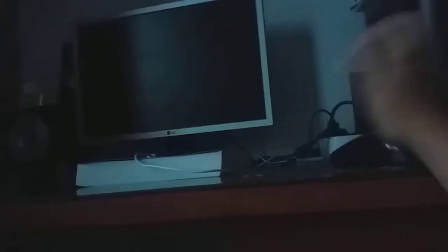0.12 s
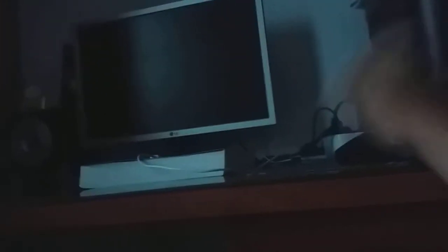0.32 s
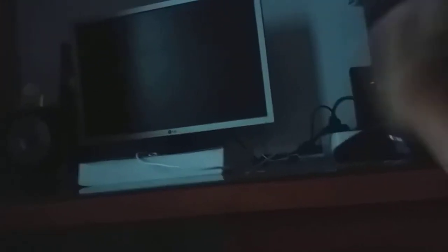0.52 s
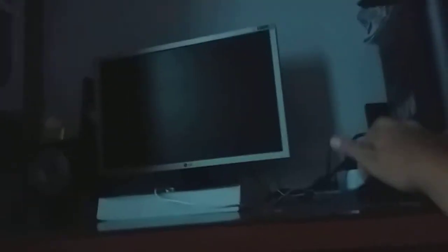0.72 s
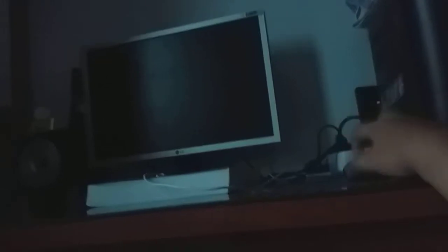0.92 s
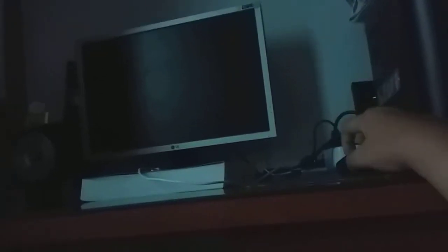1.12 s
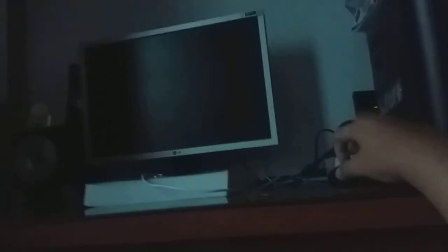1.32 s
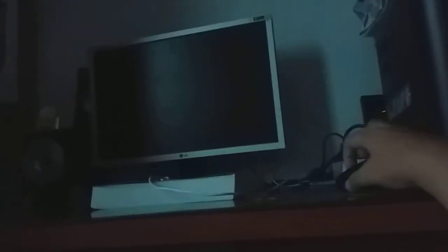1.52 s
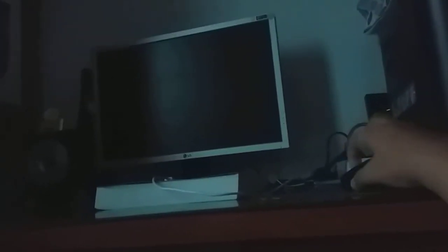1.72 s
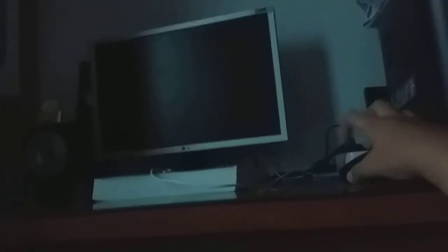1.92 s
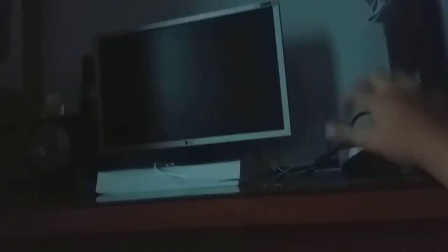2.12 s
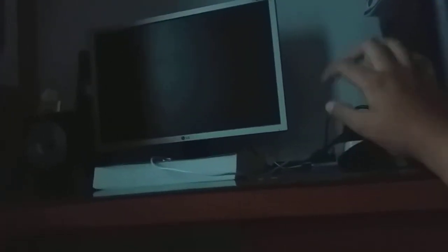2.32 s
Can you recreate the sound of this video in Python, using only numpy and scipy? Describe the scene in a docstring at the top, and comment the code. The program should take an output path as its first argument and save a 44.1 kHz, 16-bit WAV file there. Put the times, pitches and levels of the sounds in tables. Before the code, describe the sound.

Sharp mouse clicks come unevenly, strong ones early, a softer one near the middle, then more of mixed strength; low desk thumps, tiny ticks between, short bright room echo and very faint background hiss.

```python
"""Mouse clicks on a wooden desk

In a small, bare room a computer mouse is clicked four or five times a second. Each press is a broad crack
plus resonances of the plastic shell, with a swelling thump of the desk. Light ticks, two with a thin
metallic ping, come from the same model. Shaped noise and ringing modes give the bright, short echo;
filtered noise lies beneath. The stereo microphone hears one source, balanced by frequency."""
import sys
import numpy as np
from scipy import signal
from scipy.fft import rfft, irfft, next_fast_len
from scipy.io import wavfile
from scipy.ndimage import uniform_filter1d

SR = 44100
rng = np.random.default_rng(int(sys.argv[2]) if len(sys.argv) > 2 else 0)


def master(y):
    """Save y as 16-bit WAV."""
    cut = np.clip(np.atleast_2d(y).T, -1, 1)
    pcm = np.round(cut * 32767)  # scale
    wavfile.write(sys.argv[1], SR, pcm.astype(np.int16))


N = 108045
LEAD_IN_S = 1  # room on the track for a press that begins before time zero


def amp(db):
    """Decibels to gain."""
    return 10 ** (np.asarray(db) / 20)


def at(points, hz):
    """Read (freq_hz, value) points on a log-frequency axis."""
    point_hz, values = np.array(points, float).T
    return np.interp(np.log(np.maximum(hz, 1)), np.log(point_hz), values)


def fade(t, t60):
    """Exponential decay, 60 dB in t60 seconds."""
    return np.exp(-np.log(1000) * t / t60)


def colour(x, points):
    """Minimum-phase filter with the given (freq_hz, level_db) response, built by folding its cepstrum."""
    size = 2 * next_fast_len(len(x))
    hz = np.fft.rfftfreq(size, 1 / SR)
    cepstrum = irfft(np.log(amp(at(points, hz))))
    cepstrum[1:size // 2] *= 2
    cepstrum[size // 2 + 1:] = 0
    response = np.exp(rfft(cepstrum))
    return irfft(rfft(x, size) * response)[:len(x)]


def burst(envelope, size):
    """Noise under an envelope, its spectrum evened out to gain 1 over groups of `size` bins."""
    noise = rng.standard_normal(len(envelope)) * envelope
    spectrum = rfft(noise, 2 * len(noise))
    power = uniform_filter1d(abs(spectrum) ** 2, size)
    return irfft(spectrum / np.sqrt(power + 1e-12))[:len(noise)]


def add(track, start_s, x):
    """Mix a sound into the track, counting time from the end of the lead-in."""
    i = int((start_s + LEAD_IN_S) * SR)
    track[i:i + len(x)] += x[:len(track) - i]


# button presses on the desk: start_s, level_db, pitch_ratio (of the shell), contact_t60_s,
# bass_db, presence_db, knock_db, treble_db, thump_db (of the desk, apart from level_db)
BUTTON_PRESSES = [(-.07, 2, 0.94, 0.0082, -19, -0.5, -19, 1.5, -1),
                  (0.012, -17.5, 1.11, 0.035, -2, -3, 3.5, -13, -24),
                  (0.203, 2, 0.973, 0.01, -1.5, 2.5, 0, 2.5, 3),
                  (0.3833, 3, 0.98, 0.012, -5, 0, 2.5, -2, -0.5),
                  (0.5953, 0.5, 0.92, 0.0085, 4, 2, 0.5, 3, 4.5),
                  (0.9674, -13.5, 0.98, 0.033, -17, -7, 3.5, -8, -10),
                  (1.355, -1.5, 1.007, 0.028, 6, 1.5, -15, -1, 0),
                  (1.5665, -8.5, 0.985, 0.0097, -4, -5, 10.5, 1, -7),
                  (1.7735, 1, 0.96, 0.0095, -5.5, -0.5, -1, -2, -12),
                  (1.9967, -2, 0.96, 0.0064, -3.5, 2, -7, 1, -15),
                  (2.1583, -10.5, 0.94, 0.077, 8.5, -5.5, 5, -11.5, -1)]


def play_presses(track):
    """Each press snaps through its own freshly drawn desk and room echo, and thumps the desk."""
    for start_s, level_db, pitch_ratio, contact_t60, *tone_db, thump_db in BUTTON_PRESSES:
        press = strike(click(pitch_ratio, *tone_db), contact_t60, surroundings())
        add(track, start_s, amp(level_db) * press)
        add(track, start_s, amp(thump_db) * thump())


# light ticks as the button lets go or a finger shifts:
# start_s, level_db, bass_db, treble_db, thump_db (of the desk, apart from level_db)
LIGHT_TICKS = [(.043, -27.5, 13, -11, -10.5), (0.469, -13, -5, -7, -7.5), (.7593, -31, 10, 8.5, -16),
               (.7795, -26, -19.5, -4, -43), (.7845, -22, 6.5, -3, -10.5), (0.9537, -46.5, -13, 1, -29),
               (1.154, -29, -9, 7, -18), (1.2214, -32, 3.5, 5.5, -14.5), (1.4674, -27.5, 10, 3.5, -17),
               (1.6607, -30, -4, 5, -30), (1.8942, -28, -9, 4.5, -25), (2.0977, -35, -33, 8, -18),
               (2.4205, -50.5, 21, 13.5, -21.5)]
TICK_PITCH_RATIO, TICK_CONTACT_S = 0.98, 0.016  # shell pitch; t60 of the contact
TICK_ROOM_DB = -1.5  # light ticks stir the room less


def play_ticks(track):
    """Ticks are weaker snaps of the same shell, all heard through one response of desk and room."""
    room = amp(TICK_ROOM_DB) * surroundings()
    for start_s, level_db, bass_db, treble_db, thump_db in LIGHT_TICKS:
        presence_db, knock_db = treble_db / 2, 0
        snaps = click(TICK_PITCH_RATIO, bass_db, presence_db, knock_db, treble_db)
        add(track, start_s, amp(level_db) * strike(snaps, TICK_CONTACT_S, room))
        add(track, start_s, amp(thump_db) * thump())


def strike(snaps, contact_t60, room):
    """A snap heard directly, with its chatter, and again through desk and room."""
    towards, around = snaps
    sound = signal.fftconvolve(around, room)
    direct = signal.fftconvolve(towards, contact(contact_t60))
    sound[:len(direct)] += direct
    return sound


# modes of the plastic shell, before pitch, scatter and tone:
# freq_hz, level_db, t60_s, knock_share (part in the hollow knock, 0-1)
SHELL_MODES = [(509, 16, 0.039, 0.17), (798, 20.5, 0.014, 0), (1328, 11, 0.025, 0.18), (1602, 16, 0.024, 0),
               (2174, 19, 0.02, 0), (2340, 13.5, 0.011, 0.3), (2710, 14, 0.022, 0.22),
               (3215, 9.5, .015, 0.1), (3776, 9.5, 0.012, 0.85), (5435, 7.5, 0.017, 0),
               (5670, 8, 0.012, 0.27), (6720, 3.5, 0.01, 0), (7320, 6.5, 0.008, .3), (8680, 0, .01, 0.02),
               (12850, 0, 0.0072, 0)]
# snap of the contact: freq_hz, level_db (per Hz)
CONTACT_CRACK = [(60, -0.5), (300, 3.5), (1000, 0.5), (2500, 2), (4400, 4), (6200, 3.5), (9500, 0),
                 (15000, -0.5), (17000, -4)]
# change to the crack on its direct way to the microphone: freq_hz, level_db
DIRECT_CRACK_TONE = [(300, -4.5), (2500, -2), (5000, -3), (9000, 0), (15000, 0.5)]
# corners of each click's tone, the 2nd, 4th and 5th set by bass, presence and treble: freq_hz
TONE_CORNERS = [100, 400, 800, 2300, 6500]
STRIKE_SCATTER_DB = 1.2  # standard deviation of each mode's level
DIRECT_SHELL_DB, DIRECT_KNOCK_SHARE = 1, 0.5  # the modes, the knock above all, beam to the listener


def click(pitch_ratio, bass_db, presence_db, knock_db, treble_db):
    """One snap, a broad crack plus shell resonances: towards the listener, and into the room."""
    hz = np.geomspace(30, SR / 2, 1200)
    crack_db = at(CONTACT_CRACK, hz)
    power = amp([crack_db + at(DIRECT_CRACK_TONE, hz), crack_db]) ** 2
    for freq_hz, mode_db, t60, knock_share in SHELL_MODES:
        centre_hz = freq_hz * pitch_ratio
        width_hz = np.log(1000) / (np.pi * t60)
        mode_knock_db = knock_share * knock_db
        around_db = mode_db + mode_knock_db + STRIKE_SCATTER_DB * rng.standard_normal()
        towards_db = around_db + DIRECT_SHELL_DB + DIRECT_KNOCK_SHARE * mode_knock_db
        gain = amp([[towards_db], [around_db]])
        detuning = (hz ** 2 - centre_hz ** 2) / (hz * width_hz)
        power += gain ** 2 / (1 + detuning ** 2)
    tone_points = list(zip(TONE_CORNERS, [0, bass_db, 0, presence_db, treble_db]))
    spectra_db = 10 * np.log10(power) + at(tone_points, hz)
    impulse = signal.unit_impulse(SR // 16)
    return [colour(impulse, np.column_stack([hz, spectrum_db])) for spectrum_db in spectra_db]


CONTACT_RISE_S = 0.00021
BOUNCE_S, BOUNCE_SHARE = 0.00127, 0.23  # delay and relative size of the button's one rebound


def contact(t60):
    """The parts chatter as they meet, briefly if crisp, longer if soft, and rebound once."""
    t = np.arange(SR // 16) / SR
    envelope = (1 - np.exp(-t / CONTACT_RISE_S)) * fade(t, t60)
    chatter = burst(envelope, size=70)
    rebound = np.concatenate([np.zeros(int(BOUNCE_S * SR)), chatter])[:len(t)]
    return (chatter + BOUNCE_SHARE * rebound) / np.hypot(1, BOUNCE_SHARE)


# dull thump of the desk, before each event's thump level: freq_hz, level_db, peak_s (time to its peak)
DESK_THUMP = [(93, -42.5, 0.011), (119.6, -34.5, .020), (182, -39, 0.026), (231, -42, 0.022),
              (325.5, -43.5, .022)]


def thump():
    """The desk top takes up the push slowly and booms for a few cycles."""
    t = np.arange(SR // 6) / SR
    boom = np.zeros(len(t))
    for freq_hz, level_db, peak_s in DESK_THUMP:
        swell_and_die = (t / peak_s * np.exp(1 - t / peak_s)) ** 6.0
        boom += amp(level_db) * swell_and_die * np.sin(2 * np.pi * freq_hz * t)
    return boom


# pings of a small spring: start_s, pitch_hz, spread_hz, level_db, t60_s
SPRING_PINGS = [(1.154, 7950, 380, -47.5, 0.29), (1.2212, 12760, 230, -53, 0.2)]


def play_pings(track):
    """Two ticks carry the ring of a small spring, sent straight to the microphone."""
    for start_s, pitch_hz, spread_hz, level_db, t60 in SPRING_PINGS:
        add(track, start_s, amp(level_db) * ping(pitch_hz, spread_hz, t60))


def ping(pitch_hz, spread_hz, t60):
    """A cluster of close, high spring modes that beat together as they decay."""
    t = np.arange(SR // 3) / SR
    modes = rng.standard_normal((24, 2))  # detuning, phase
    ring = sum(np.sin(2 * np.pi * ((pitch_hz + spread_hz / 2 * detune) * t + phase))
               for detune, phase in modes)
    return ring / np.sqrt(len(modes) / 2) * fade(t, t60)


# long modes of the desk and the things on it: freq_hz, level_db, t60_s (before the cap below)
DESK_MODES = [(318.3, 17.5, 0.28), (490.2, -5, 0.29), (705, 3, 0.12), (782.7, 5, 0.24), (876, 8.5, 0.29),
              (886, 2.5, 0.51), (1023, 12, 0.35), (1356, 1, .35), (1606, 9.5, 0.16), (1730, -4.5, 0.25),
              (2116, -5, 0.52), (2880, 11.5, .35), (2825, -1, .35), (3050, -6.5, 0.12)]
DESK_MAX_T60_S = 0.4
# first reflections off the walls: delay_s, level_db
WALL_REFLECTIONS = [(.0084, -17.5), (.0094, -14)]
# diffuse room echo: freq_hz, level_db (against the direct sound)
ROOM_ECHO = [(40, 2.5), (90, 10), (250, 8), (450, -0.5), (800, -0.5), (1300, 1.5), (2200, -4), (3100, 0),
             (4400, -4.5), (6500, 1), (10000, -0.5), (16000, -2)]
# decay of the room echo: freq_hz, t60_s
ROOM_DECAY = [(100, 0.35), (400, 0.32), (1000, 0.3), (2500, 0.31), (7000, 0.29), (15000, 0.33)]
ROOM_ONSET_S, ROOM_RISE_S = 0.002, 0.0014


def surroundings():
    """Response of desk and room: first reflections, ringing desk modes, diffuse echo."""
    t = np.arange(SR * 2 // 3) / SR
    hz = np.fft.rfftfreq(len(t), 1 / SR)
    mean_t60 = np.mean([t60 for _, t60 in ROOM_DECAY])
    swell = 1 - np.exp(-np.maximum(t - ROOM_ONSET_S, 0) / ROOM_RISE_S)
    noise = rfft(burst(swell * fade(t, mean_t60), size=150))
    echo = 0
    # overlapping bands, each bent from the mean decay to its own
    for shares, (_, t60) in zip(np.eye(len(ROOM_DECAY)), ROOM_DECAY):
        band = at([(freq_hz, share) for (freq_hz, _), share in zip(ROOM_DECAY, shares)], hz)
        echo = echo + irfft(noise * band, len(t)) * fade(t, t60) / fade(t, mean_t60)
    response = colour(echo, ROOM_ECHO)
    for freq_hz, level_db, t60 in DESK_MODES:
        t60 = min(t60, DESK_MAX_T60_S)
        peak_scale = 2 * np.log(1000) / (t60 * SR)  # level_db is then about the gain at resonance
        ring = np.sin(2 * np.pi * (freq_hz * t + rng.random()))
        response += amp(level_db) * peak_scale * swell * fade(t, t60) * ring
    for delay_s, level_db in WALL_REFLECTIONS:
        response[int(delay_s * SR)] += amp(level_db)
    return response


# shape of the room's background, before it is set to the level below: freq_hz, level_db (per Hz)
ROOM_FLOOR = [(25, -9.5), (50, -12), (105, -1.5), (200, -9), (400, -14.5), (1000, -16.5), (3000, -26.5),
              (8000, -35), (15000, -24)]
FLOOR_DB = -60  # RMS level ahead of the microphone


def background():
    """Faint rumble and hiss of the room, as steady filtered noise."""
    noise = colour(rng.standard_normal(N), ROOM_FLOOR)
    return noise / np.std(noise) * amp(FLOOR_DB)


def scene():
    """Presses, ticks and pings over the room's background, the same in both channels."""
    track = np.zeros(N + LEAD_IN_S * SR)
    play_presses(track)
    play_ticks(track)
    play_pings(track)
    heard = track[LEAD_IN_S * SR:] + background()
    return np.array([heard, heard])


# the microphone's left-to-right balance: freq_hz, level_db (positive is louder on the left)
MIC_BALANCE = [(30, 0), (600, 0), (1900, -.4), (3000, -3.3), (4400, -7.8), (5600, -10), (7200, -5.5),
               (8400, 0), (8900, 0), (9300, 3), (11700, 3), (13800, 0)]
LOW_CUT_HZ, TOP_HZ = 66, 15900


def record(dry):
    """The microphone leans right in the low treble and left above it, and cuts the deep bass and the top."""
    size = 2 * next_fast_len(N)
    hz = np.fft.rfftfreq(size, 1 / SR)
    ratio = amp(at(MIC_BALANCE, hz))
    low_cut = hz ** 4 / np.hypot(hz ** 4, LOW_CUT_HZ ** 4)
    balance = np.array([2 * ratio, np.full_like(ratio, 2)]) / (1 + ratio)  # left, right
    out = irfft(rfft(dry, size) * low_cut * balance)[:, :N]
    top_cut = signal.ellip(8, 0.2, 70, TOP_HZ, fs=SR, output="sos")
    return signal.sosfilt(top_cut, out)


dry = scene()
out = record(dry)
master(out)
```